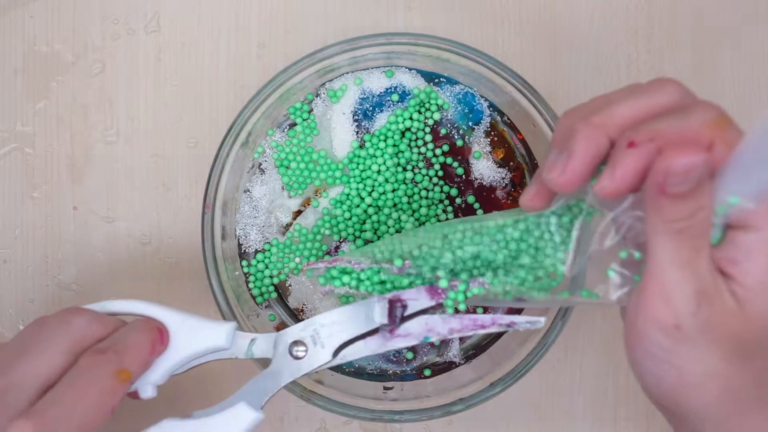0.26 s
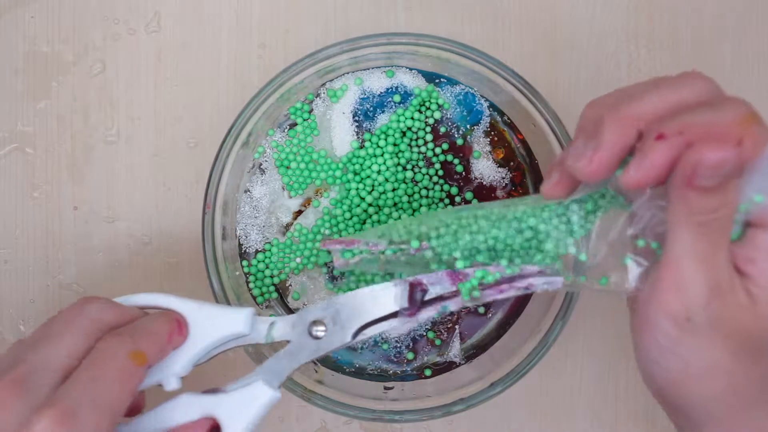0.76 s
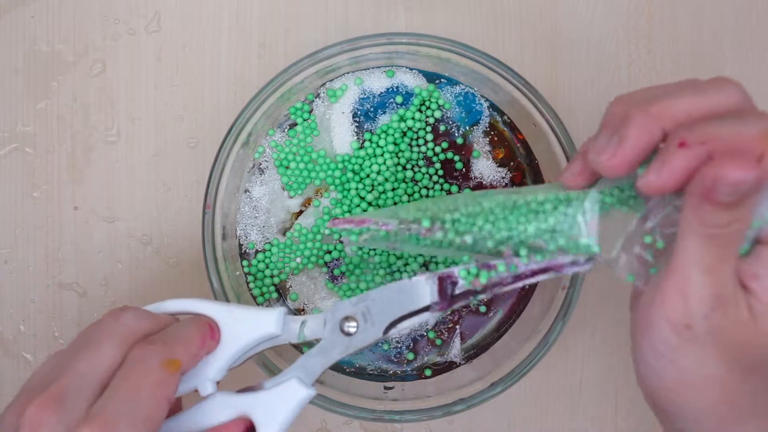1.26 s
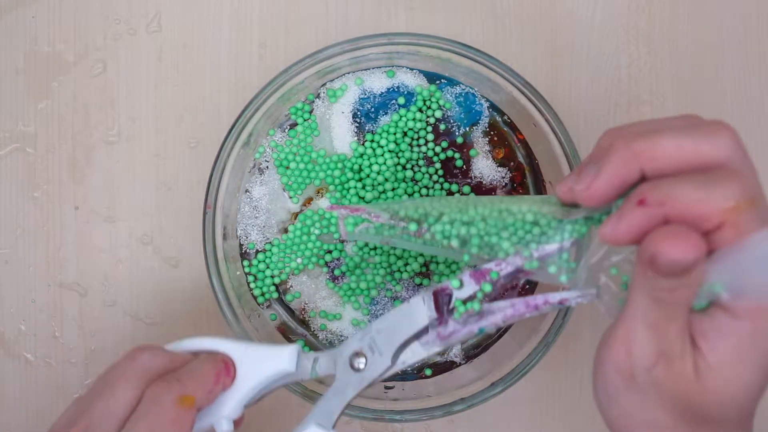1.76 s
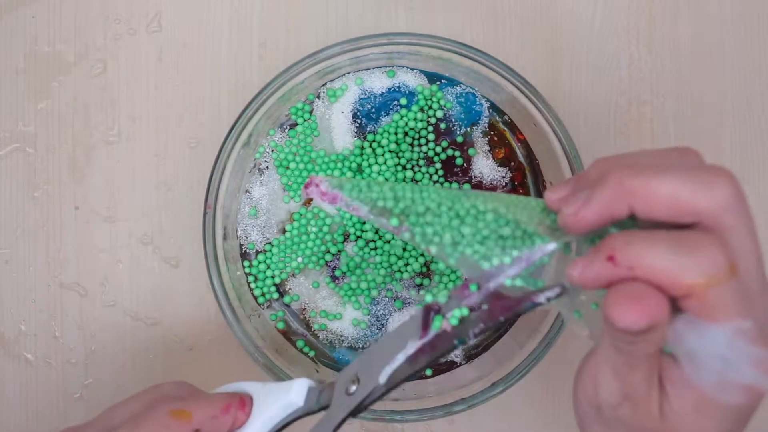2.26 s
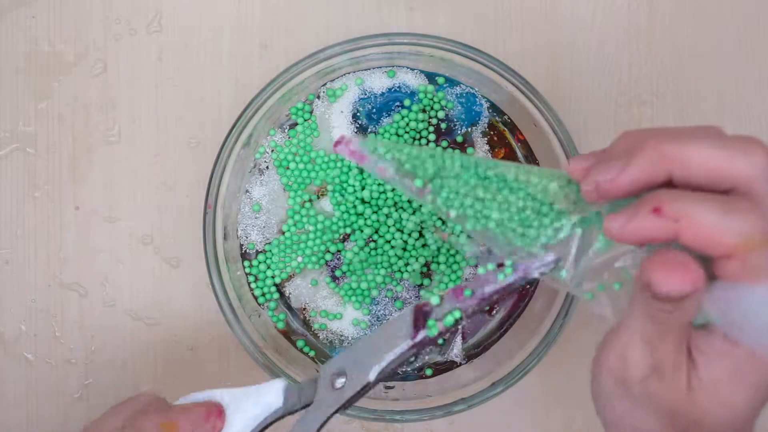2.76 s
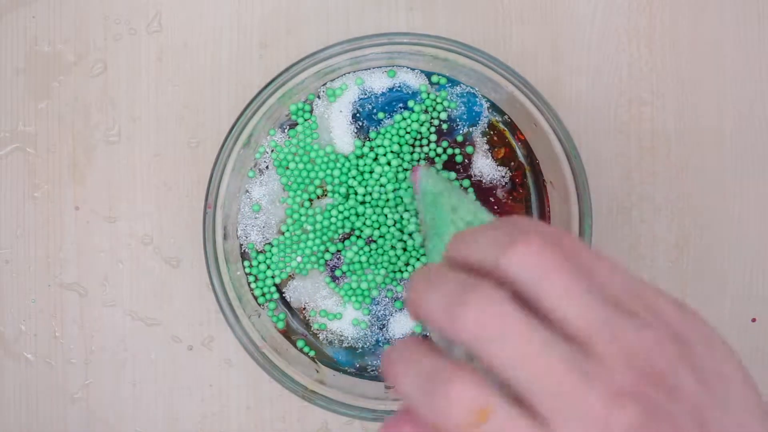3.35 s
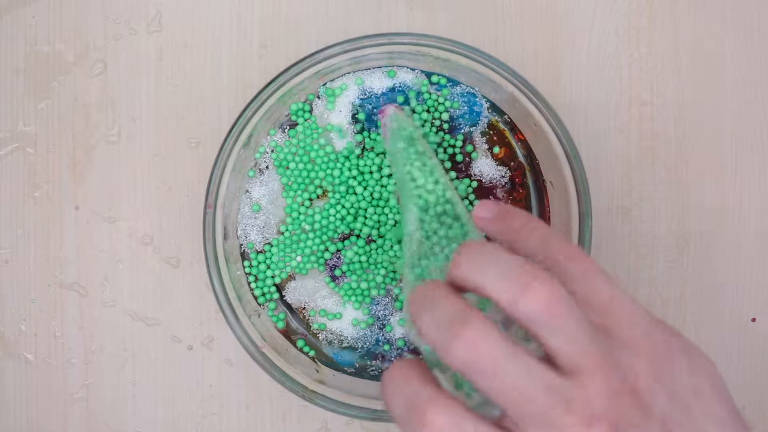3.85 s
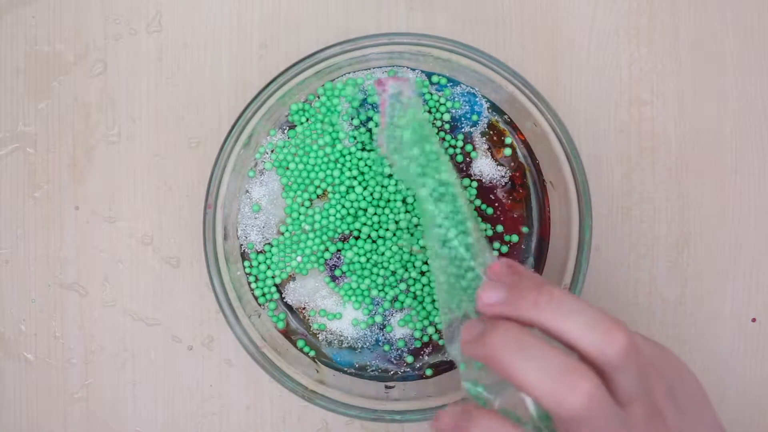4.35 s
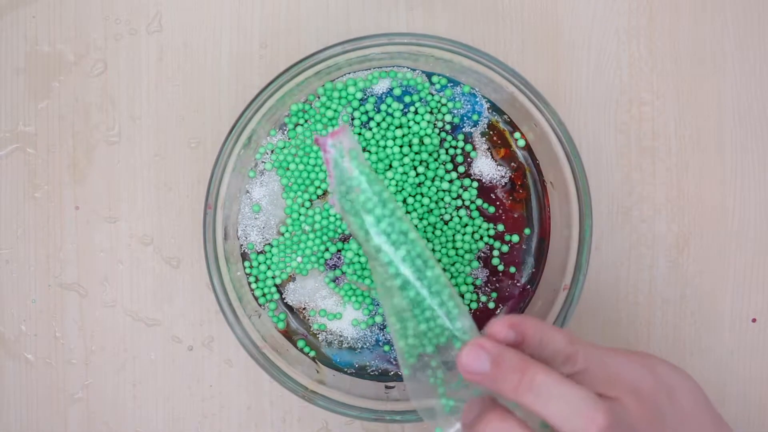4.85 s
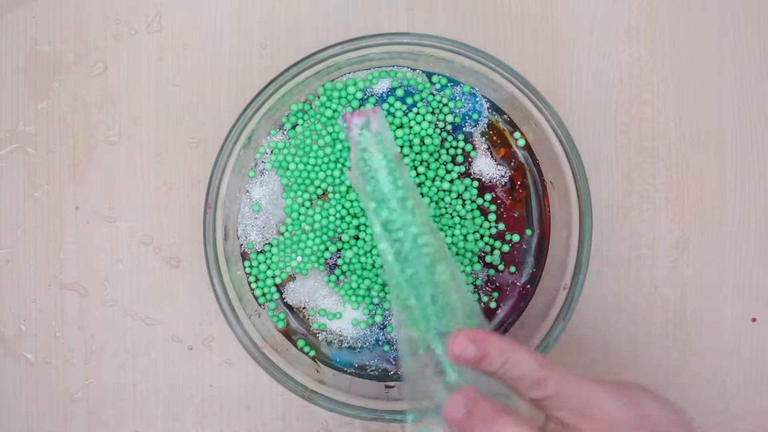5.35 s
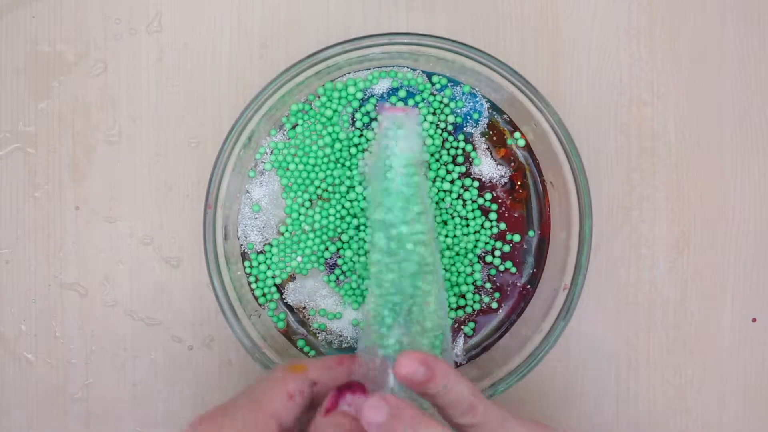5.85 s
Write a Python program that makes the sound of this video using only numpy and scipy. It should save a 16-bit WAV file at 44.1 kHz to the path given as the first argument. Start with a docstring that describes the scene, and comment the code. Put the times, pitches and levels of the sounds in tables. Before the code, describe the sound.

Thin film crinkles busily for the first three seconds, dry and crisp, over a soft grainy rustle of foam beads. After a quieter pause come isolated snaps, gentle low bumps, then a strong dull thump with a loud crackle around five seconds. Close microphone, mono, little room sound, very quiet background.

```python
"""A thin plastic bag is cut and squeezed over a glass bowl, close to the microphone in a small quiet room.
Each crackle is a cluster of tiny buckles of the film that rings a crease, the bag and small panels.
Between them spilling foam beads and fingers rustle: dense small buckles in clumps, with lone ticks.
Bumps of the hands thud through the table as short low cycles and leave its top ringing over a rumble.
The bowl adds resonances, the room a faint tail of random taps, and a quiet noise floor lies beneath."""
import sys
import numpy as np
from scipy import signal
from scipy.fft import rfft, irfft
from scipy.io import wavfile
from scipy.ndimage import uniform_filter1d

SR = 44100
rng = np.random.default_rng(int(sys.argv[2]) if len(sys.argv) > 2 else 0)


def transcribe(u):
    """Save the signal u as a 16-bit wav file named by the first command-line argument.

    u: samples, shape (n,) or (channels, n), limited to [-1, 1]; the rate is SR.
    q: integer samples, one column per channel.
    """
    v = np.clip(np.atleast_2d(u).T, -1, 1)
    q = np.round(v * 32767).astype(np.int16)
    wavfile.write(sys.argv[1], SR, q)


N = 268569  # samples

# Crackles of the film, levels ahead of the mix; body and edge are relative to the level:
# peak_s, level_db, crease_hz, body_db, edge_db, rise_s, t60_s
CRACKLE_EVENTS = [(0.067, -62.5, 2100, -14, 8.5, .007, .049), (0.084, -47.5, 2000, -9, -2.5, 0.0071, 0.039),
                  (0.28, -51, 1600, -3.5, -18, 0.0035, 0.052),
                  (0.296, -53.5, 1220, -21, -1.5, 0.0094, 0.047),
                  (0.352, -61.5, 1980, -10, 3.5, .011, 0.04), (0.467, -51.5, 1220, -9, -2, 0.0097, 0.042),
                  (0.498, -52, 830, 1, 0, 0.015, 0.11), (0.521, -41.5, 2040, -5.5, -2.5, 0.0047, 0.062),
                  (0.543, -47, 1720, -16, 6.5, 0.0028, 0.023), (0.557, -40, 2200, -1.5, 0, 0.013, 0.041),
                  (0.607, -45.5, 1200, -9, -17, 0.0044, 0.035),
                  (0.633, -55.5, 1960, 1.5, 6.5, 0.0068, 0.078),
                  (0.692, -40, 1035, -10, -51, 0.0022, 0.055), (0.718, -57.5, 1650, -12, -2, 0.0033, 0.066),
                  (0.741, -60, 1300, -5, 0.5, 0.0071, 0.058), (0.786, -58.5, 1100, 3.5, -18, .0026, 0.084),
                  (0.819, -55, 1110, -9, -0.5, 0.0027, 0.71), (0.854, -45.5, 1210, 1.5, -4, 0.02, 0.11),
                  (0.864, -32.5, 2130, -41, -7, 0.0025, 0.052),
                  (0.925, -40, 1910, -5.5, -3.5, 0.0016, 0.051),
                  (0.946, -44.5, 2280, -19, -5.5, 0.0075, 0.027), (0.957, -51, 1000, 0, -20, .0054, .034),
                  (0.981, -44, 1560, -6, 1.5, 0.0034, 0.053), (1.007, -56.5, 1230, -1.5, 0.5, 0.0018, 0.3),
                  (1.057, -32.5, 2370, -26, 1.5, 0.0036, 0.065),
                  (1.119, -39.5, 1630, -14.5, -4, .0043, 0.09), (1.155, -67, 1600, -15, 12, 0.0055, .07),
                  (1.175, -39.5, 1700, -1.5, -1, 0.02, 0.033), (1.28, -60, 1140, -2, -2, .015, .057),
                  (1.324, -77, 1700, -20, 11, .004, 0.043), (1.382, -47.5, 1650, -4.5, -1, 0.024, 0.083),
                  (1.482, -50.5, 2160, -0.5, -12, 0.0071, 0.034), (1.703, -46, 1220, -31, 1, 0.0054, 0.14),
                  (1.712, -48.5, 1300, -4.5, -27, 0.012, 0.19), (1.883, -54.5, 1240, -8, -3.5, .011, 0.12),
                  (1.925, -58, 1250, 0.5, -2, .005, .05), (1.936, -44.5, 1240, -19, -11.5, 0.0019, 0.1),
                  (1.978, -49, 1150, 0.5, -17, 0.002, 0.038), (2.001, -45.5, 1570, -2, -0.5, 0.0026, 0.051),
                  (2.051, -56.5, 1680, -1.5, 4, 0.01, 0.25), (2.076, -40.5, 1250, -9, -7.5, 0.022, 0.078),
                  (2.115, -36.5, 1920, -5, 0.5, 0.03, 0.044), (2.137, -44, 1250, -27, 2, 0.0053, 0.049),
                  (2.168, -52.5, 1200, -8, -7, .007, .04), (2.177, -39, 1190, -5.5, -7, 0.004, 0.072),
                  (2.213, -40, 1130, -1.5, -13.5, 0.0026, 0.061), (2.245, -63, 1400, -5, 3, .021, .09),
                  (2.397, -68, 1500, -6.5, 1.5, .0045, .05), (2.433, -54.5, 1170, -10.5, -4.5, 0.014, 0.15),
                  (2.445, -59.5, 1290, -21, -8, 0.0062, .08), (2.478, -45, 1230, -11, -10, 0.027, 0.04),
                  (2.489, -61, 1300, 3, 4, 0.013, 0.051), (2.516, -54, 1120, -1.5, -17, 0.0016, 0.11),
                  (2.557, -61.5, 2690, -15.5, -7.5, .0026, .04),
                  (2.635, -26.5, 1285, -3.5, 3.5, 0.011, 0.052), (2.834, -83, 1590, -24, 0, .0034, 0.064),
                  (2.887, -42, 1940, -4, -4, 0.01, 0.055), (2.952, -75.5, 1600, -21, 12.5, .004, 0.036),
                  (2.986, -57, 1120, 1, -7, 0.0015, 0.066), (3.644, -48.5, 2440, -17, -11, .0036, 0.08),
                  (3.683, -34.5, 1240, -10.5, -40, 0.0011, 0.05),
                  (3.907, -44, 1150, -5, -5.5, 0.0017, 0.043), (4.097, -50, 1860, -0.5, 0.5, 0.0019, 0.044),
                  (4.181, -63, 1880, 2, -14, .0066, 0.07), (4.235, -33.5, 1550, -9.5, -1, 0.002, .067),
                  (4.721, -32, 1490, -7.5, -17, 0.001, 0.044), (4.727, -38, 2620, -20, -22, 0.0023, 0.03),
                  (4.762, -44.5, 1100, 3, -25, 0.0037, 0.035), (4.775, -36, 1160, -13, 5, 0.0025, 0.05),
                  (5.024, -25, 1370, -5, -13, 0.0041, 0.044), (5.05, -59, 1520, 3, -31, 0.017, 0.18),
                  (5.211, -60.5, 1260, -3, -27, 0.0058, 0.25), (5.68, -69, 2000, 10.5, 5, 0.0039, 0.087),
                  (5.701, -61.5, 1740, -10.5, 3.5, 0.028, 0.29),
                  (5.745, -49.5, 1280, -10.5, -20, 0.013, 0.033),
                  (5.889, -52, 1400, -7.5, -9, 0.00095, 0.15),
                  (5.983, -38.5, 1120, -12, -16, 0.0021, 0.054), (6.065, -61, 1280, -4.5, -17, .03, .09)]


def crackles():
    """Each cluster of buckles rings its own crease, with the bag's body below and edge and fizz above."""
    # The bag as a whole: frequency_hz, level_db (per Hz)
    body_spectrum = [(130, -12), (300, -2), (470, 2.5), (590, -0.5), (690, -3.5), (820, 2), (1100, -27.5)]
    # The finest treble of the snaps: frequency_hz, level_db (per Hz)
    fizz_spectrum = [(4000, -27.5), (5800, -1), (8500, -4), (11000, -7.5), (16000, -15.5)]
    snaps = buckles(per_s=20000, spread_db=1.0)
    ragged = gain_of(0.65 * clumps(size=60))  # buckles come in uneven bunches
    body = coloured(snaps, body_spectrum)
    edge = band(snaps, 1296, 5800)
    fizz = coloured(snaps, fizz_spectrum)
    sheet = band(snaps, 852, 2610)

    t = np.arange(-0.06, 0.25, 1 / SR)  # seconds from the peak
    before = round(-t[0] * SR)
    out = np.zeros(N + len(t))
    layers = (snaps, ragged, body, edge, fizz, sheet)
    snaps, ragged, body, edge, fizz, sheet = (np.pad(v, (before, len(t)), "wrap") for v in layers)
    patches = rng.random((len(CRACKLE_EVENTS), 4))  # chance pitches of the small panels
    for event, patch in zip(CRACKLE_EVENTS, patches):
        s, level_db, crease_hz, body_db, edge_db, rise, t60 = event
        cut = slice(round(s * SR), round(s * SR) + len(t))
        smooth = swell(t, rise, t60)
        shape = smooth * ragged[cut]

        drive = snaps[cut] * shape
        # a sudden crackle opens with one big buckle
        drive[np.searchsorted(t, -rise / 2)] += 30 * np.exp(-rise / 0.0078)
        narrow = resonate(drive, crease_hz, 0.19 * crease_hz)
        crease = evened(resonate(narrow, crease_hz, 0.5 * crease_hz))
        # bright crackles shake more of the sheet
        crease += gain_of(0.28 * edge_db + 2.0) * evened(sheet[cut] * shape)

        low = body[cut] * shape
        bright = edge[cut] * shape
        finest = fizz[cut] * shape
        # small panels ring
        bright = bright + 1.1 * sum(resonate(bright, f, 260) for f in 2500 + 2800 * patch[:2])
        finest = finest + 0.6 * sum(resonate(finest, f, 450) for f in 5500 + 4500 * patch[2:])

        fizz_db = 1.47 * edge_db - 0.5  # dull crackles lose their fizz faster than their edge
        parts = [(0, crease), (body_db, low), (edge_db, bright), (fizz_db, finest)]
        for db, burst in parts:
            matched = burst * np.linalg.norm(smooth) / np.linalg.norm(burst)  # the energy of the envelope
            add(out, s, gain_of(level_db + db) * matched)
    return out[before:][:N]


def rustle():
    """Dense small buckles and bead contacts that come in clumps; the treble flickers on its own."""
    # Steady handling, ahead of the mix; body and fizz are relative to the rustle:
    # time_s, rustle_db, body_db, fizz_db
    handling = [(0.0, -66, -6, -8.5), (0.45, -70, -7, -7), (1.3, -72.5, -1, -5.5),
                (1.45, -65.5, -6.5, -10.5), (2.2, -73.5, -2.5, -4), (2.34, -76.5, -2, -4),
                (2.45, -69, -2, -2), (2.61, -80.5, -0.5, -3), (2.9, -72.5, -11, 4), (3.1, -78, -3, -2.5),
                (3.36, -64.5, -6.5, -3.5), (3.53, -68.5, -4.5, 0), (3.63, -64, -6.5, 1.5),
                (3.8, -67.5, -3.5, 1.5), (4.32, -68.5, -16, 0.5), (4.53, -79, -7.5, 4),
                (4.7, -75, -4, -1.5), (4.9, -68.5, -2.5, -21), (5.4, -68, -16, -4), (5.6, -74, -8, -6),
                (5.76, -68.5, -10, -3.5), (6.09, -66.5, -9.5, -1)]
    # Ringing of the film: frequency_hz, level_db (per Hz)
    film_spectrum = [(600, -68), (900, -11), (1200, 0.5), (1500, -7), (1900, -2.5), (2400, -5),
                     (2950, -6.5), (3300, -7), (3700, -12), (6000, -23)]
    # Fingers, the low part of the rustle: frequency_hz, level_db (per Hz)
    finger_spectrum = [(130, -17), (250, 3), (400, -1.5), (590, -7.5), (800, -9.5), (1100, -51)]
    # Treble of the rustle: frequency_hz, level_db (per Hz)
    fizz_spectrum = [(2800, -17), (4200, -3.5), (7800, -0.5), (9000, -7), (16000, -16)]
    settle_db, settle_t60_s = -27.5, 0.6  # the film rustles on after each crackle, this far below it

    times, *columns = np.transpose(handling)
    level_db, body_db, fizz_db = (np.interp(np.arange(N) / SR, times, c) for c in columns)
    power = gain_of(level_db) ** 2
    t = np.arange(0, 0.5, 1 / SR)
    for s, crackle_db, _, _, edge_db, _, _ in CRACKLE_EVENTS:
        settling_db = crackle_db + 0.67 * edge_db + settle_db - 60 * t / settle_t60_s
        add(power, s, gain_of(settling_db) ** 2)

    snaps = buckles(per_s=20000, spread_db=0.0)
    mixed = coloured(snaps, film_spectrum)
    mixed += gain_of(body_db) * coloured(snaps, finger_spectrum)
    mixed += gain_of(fizz_db + 1.5 * clumps(size=350)) * coloured(snaps, fizz_spectrum)
    mixed += gain_of(-9) * ticks(per_s=500, count=16)
    return np.sqrt(power) * gain_of(1.94 * clumps(size=500)) * mixed


def ticks(per_s, count):
    """Lone faint snaps, each ringing a small patch of film at one of count pitches, by chance."""
    snaps = buckles(per_s, spread_db=4.0)
    patch = rng.integers(0, count, N)
    pitches_hz = np.geomspace(1100, 5000, count)
    rings = (resonate(snaps * (patch == k), hz, 60 + 0.04 * hz) for k, hz in enumerate(pitches_hz))
    return evened(sum(rings))


def buckles(per_s, spread_db):
    """Tiny snaps of the film at chance times, random in sign and size; spread_db makes a few much larger."""
    size = gain_of(spread_db * np.minimum(rng.exponential(1, N), 4)) * rng.standard_normal(N)
    return evened(size * (rng.random(N) < per_s / SR))


def bowl(x):
    """The air in the bowl and under the bag lifts a few resonances."""
    # Resonances of the hollow: frequency_hz, width_hz, level_db
    hollow = [(332, 34, -15), (591, 41, 4.5), (933, 27, -24), (1300, 200, -16.5), (1650, 190, -3),
              (2000, 52, -3), (3220, 89, -2)]
    return x + sum(gain_of(db) * resonate(x, hz, width) for hz, width, db in hollow)


def table():
    """Low rumble through the table, and thuds of a few cycles that leave the table top ringing."""
    # Rumble, before its slow wavering: time_s, level_db
    rumble_levels = [(0.0, -65.5), (0.61, -65), (1.32, -68.5), (2.12, -69), (3.15, -65.5), (3.39, -71.5),
                     (3.87, -63.5), (4.05, -69.5), (4.65, -65), (4.75, -75), (4.92, -49), (5.0, -51),
                     (5.24, -60.5), (5.39, -68), (6.09, -66)]
    # Colour of the rumble: frequency_hz, level_db (per Hz)
    rumble_spectrum = [(15, 0), (30, 5), (70, -5.5), (120, 0.5), (170, -9.5), (260, -38)]
    # Bumps of the hands; level is that of the sine before its envelope:
    # centre_s, level_db, pitch_hz, rise_s, fall_s
    thuds = [(1.713, -37.5, 75.8, 0.02, 0.041), (1.789, -46.5, 74, .039, .038),
             (2.642, -39.5, 195, 0.0045, 0.0051), (3.828, -42.5, 103, 0.0064, 0.0074),
             (3.843, -47, 69.6, 0.0095, 0.014), (4.131, -48.5, 79.6, 0.0099, 0.0047),
             (4.303, -53.5, 76.5, 0.0054, 0.0096), (4.725, -44.5, 91, 0.019, .011),
             (4.784, -31, 137, 0.018, 0.0093), (4.79, -43, 45, .011, 0.0196),
             (4.927, -45.5, 121, 0.013, 0.029), (4.972, -51, 67.6, .006, 0.024),
             (5.029, -22, 65, 0.0027, 0.0044), (5.043, -10, 74, 0.005, 0.0029),
             (5.076, -30.5, 94, .0087, 0.007)]
    # Modes of the table top, relative to the thud: frequency_hz, level_db, t60_s
    modes = [(46.7, -23.5, 0.4), (60.3, -24, 0.41), (124, -23, .2)]

    times, levels_db = np.transpose(rumble_levels)
    rumble_db = np.interp(np.arange(N) / SR, times, levels_db) + 1.85 * clumps(size=1200)
    out = gain_of(rumble_db) * coloured(rng.standard_normal(N), rumble_spectrum)

    t = np.arange(-0.1, 0.15, 1 / SR)  # seconds from the centre of a thud
    after = np.arange(0, 0.5, 1 / SR)
    ring = sum(gain_of(db - 60 * after / t60) * np.sin(2 * np.pi * hz * after) for hz, db, t60 in modes)
    for s, level_db, hz, rise, fall in thuds:
        envelope = np.exp(-(t / np.where(t < 0, rise, fall)) ** 2)
        add(out, s + t[0], -gain_of(level_db) * np.sin(2 * np.pi * hz * t) * envelope)
        add(out, s + 2 * fall, gain_of(level_db) * ring)
    return out


def room(x):
    """Sparse taps of random sign, each band dying at its own speed."""
    # Decay of the small room: frequency_hz, t60_s
    decay = [(200, 0.55), (1000, 0.25), (4000, 0.46), (12000, 0.27)]
    taps = np.zeros(SR // 2)
    at = np.arange(200, len(taps) - 20, 20)  # one tap in every 20 samples
    taps[at + rng.integers(0, 20, len(at))] = rng.choice([-1., 1.], len(at))
    hz, t, z = signal.stft(taps, SR, nperseg=256)
    f, t60 = np.transpose(decay)
    band_t60 = np.interp(np.log(hz + 1), np.log(f), t60)[:, None]
    tail = signal.istft(z * gain_of(-60 * t / band_t60), SR, nperseg=256)[1]
    return signal.fftconvolve(x, tail / np.linalg.norm(tail))[:N]


def quiet_floor():
    """Steady coloured noise under everything."""
    # Colour of the floor: frequency_hz, level_db (per Hz)
    floor_spectrum = [(59, -77), (100, 6.5), (818, -7), (1200, -11), (1950, -1.5), (4670, -30.5),
                      (7610, -20.5), (16000, -35)]
    return gain_of(-80) * coloured(rng.standard_normal(N), floor_spectrum)


def gain_of(db):
    """Decibels to gain."""
    return 10 ** (np.asarray(db) / 20)


def evened(x):
    """Scales to rms 1."""
    return x / np.sqrt(np.mean(x ** 2) + 1e-20)


def add(mix, s, sound):
    """Mixes a sound in at s seconds."""
    part = mix[round(s * SR):][:len(sound)]
    part += sound[:len(part)]


def coloured(x, points):
    """Filters x by the spectrum through the points, rms 1."""
    f, db = np.transpose(points)
    hz = np.fft.rfftfreq(len(x), 1 / SR)
    gain = gain_of(np.interp(np.log(hz + 1), np.log(f + 1), db))
    return evened(irfft(rfft(x) * gain, len(x)))


def resonate(x, hz, width):
    """One resonance of gain 1, its width in Hz."""
    return signal.lfilter(*signal.iirpeak(hz, hz / width, SR), x)


def band(x, lo_hz, hi_hz):
    """Band-pass, rms 1."""
    return evened(signal.sosfilt(signal.butter(2, [lo_hz, hi_hz], "band", fs=SR, output="sos"), x))


def swell(t, rise, t60):
    """Rises from silence to a peak at t = 0, then falls exponentially."""
    attack = np.sin(np.pi / 2 * np.clip(1 + t / rise, 0, 1)) ** 2
    return attack * gain_of(-60 * np.maximum(t, 0) / t60)


def clumps(size):
    """Slow chance, rms 1, lumps about size samples long."""
    smooth = uniform_filter1d(rng.standard_normal(N), size=size)
    return evened(uniform_filter1d(smooth, size=size))


def scene():
    """Bag over the bowl, room, table and the quiet floor."""
    bag = gain_of(-3.5) * bowl(crackles())
    mix = bag + gain_of(-20.5) * room(bag)
    mix += gain_of(-1.5) * bowl(rustle())
    mix += table() + quiet_floor()
    return mix[None]


def record(dry):
    """A steep low-pass limits the band to 15.9 kHz."""
    lowpass = signal.firwin(511, 15900, window=("kaiser", 9), fs=SR)
    return signal.oaconvolve(dry, lowpass[None], "same")


dry = scene()
out = record(dry)
transcribe(out)
```